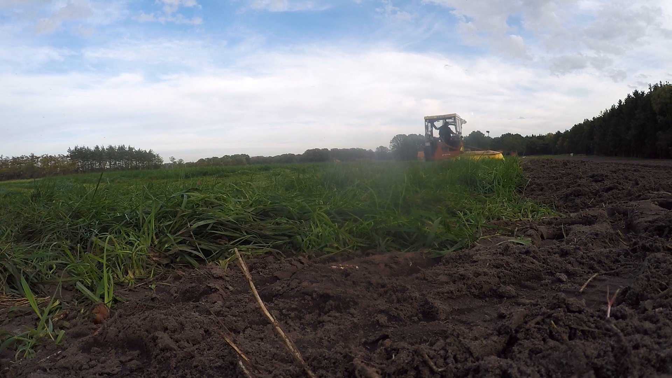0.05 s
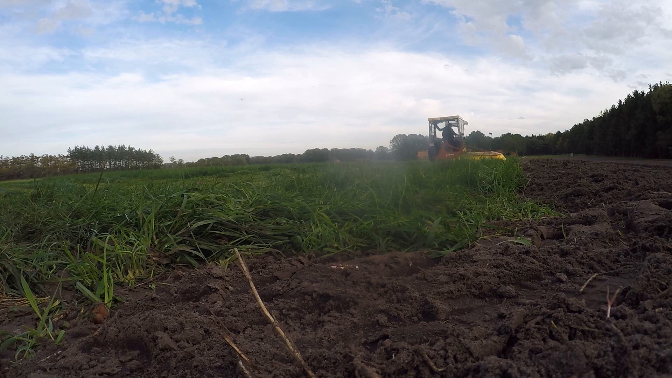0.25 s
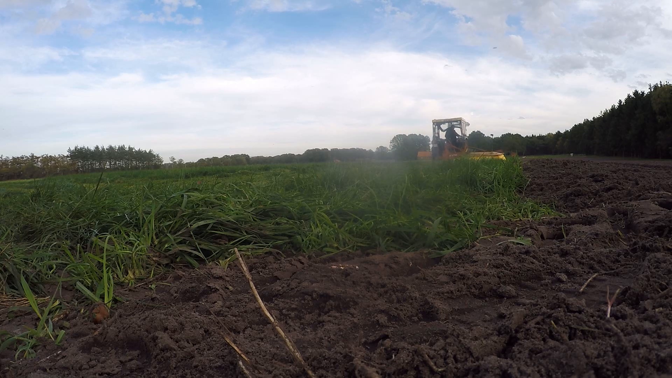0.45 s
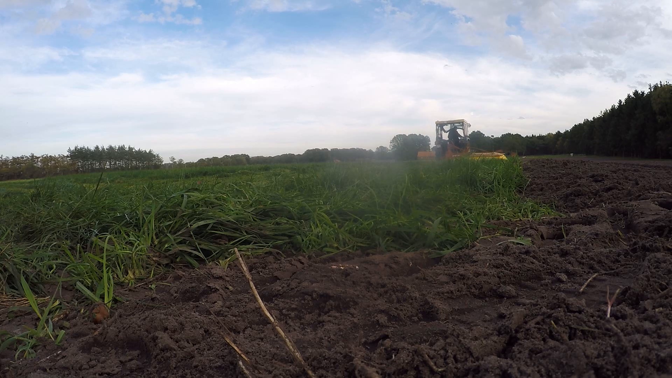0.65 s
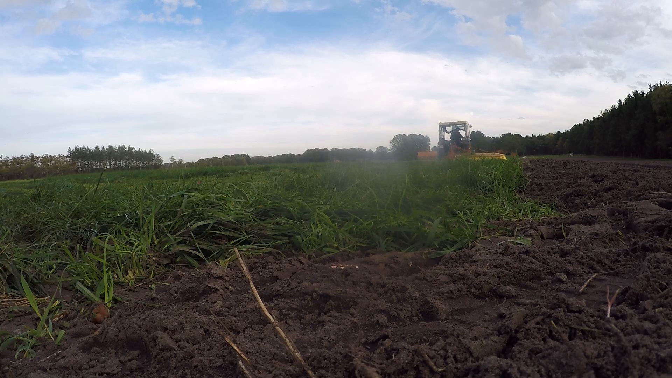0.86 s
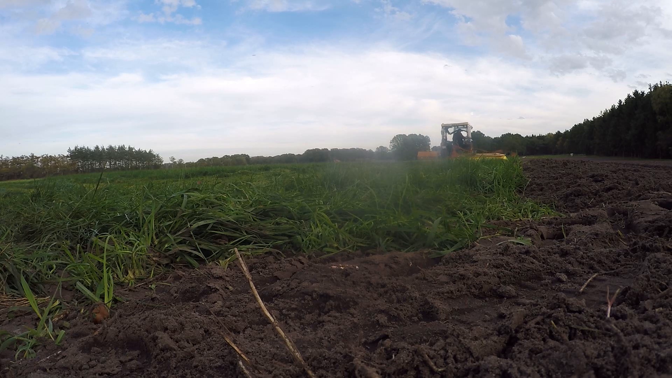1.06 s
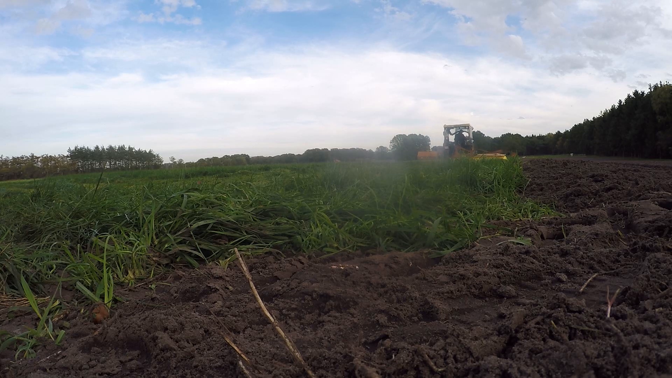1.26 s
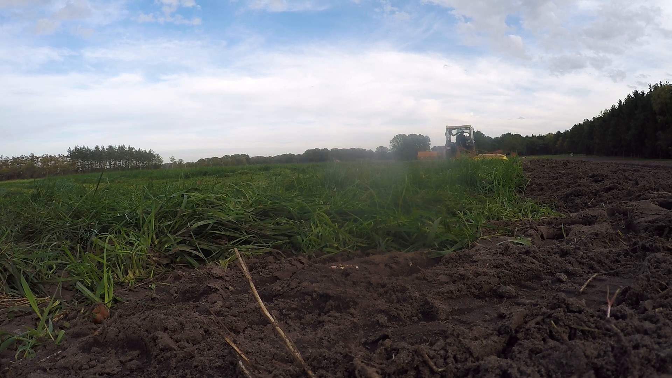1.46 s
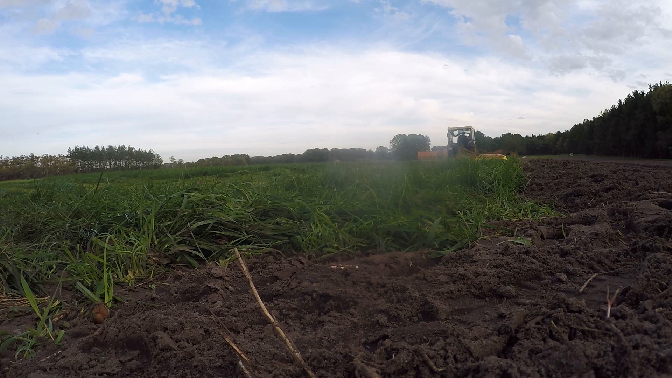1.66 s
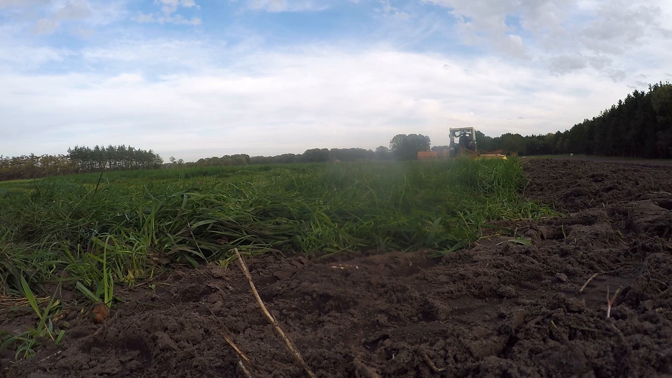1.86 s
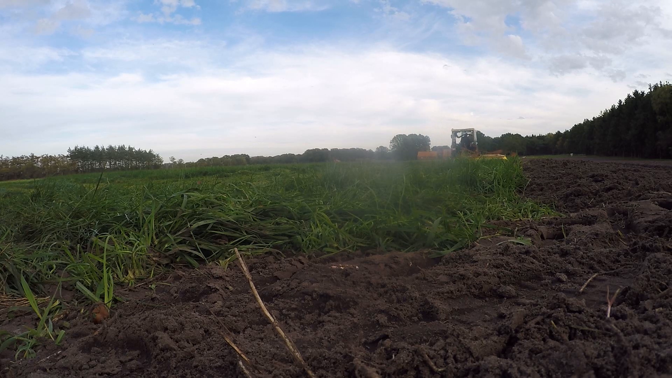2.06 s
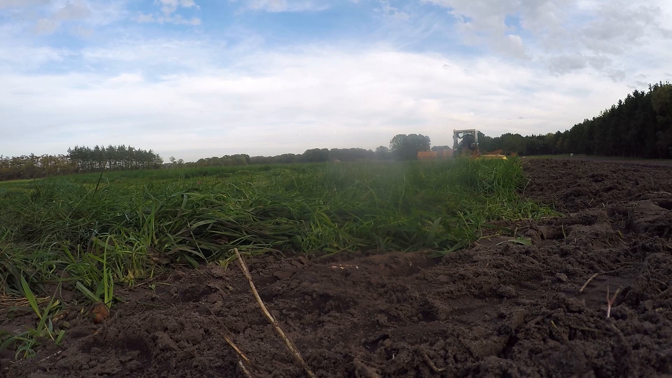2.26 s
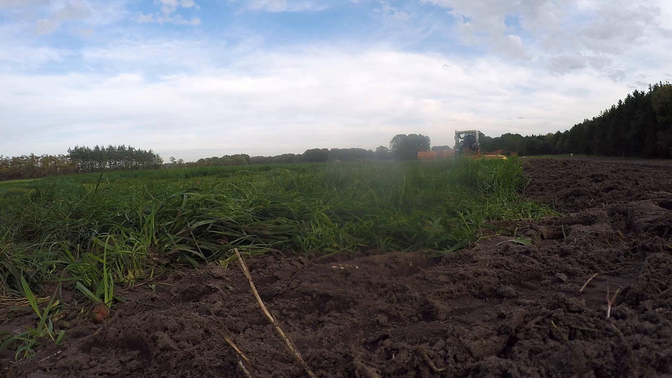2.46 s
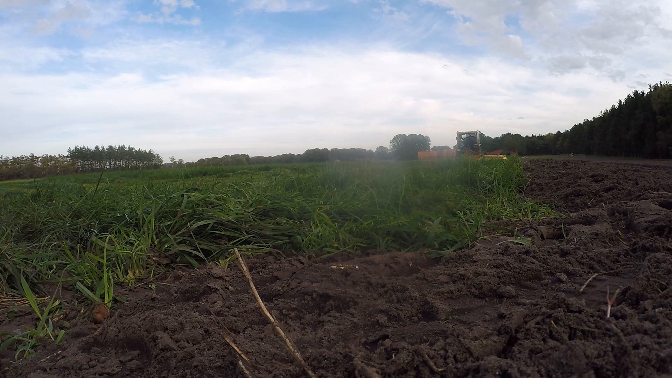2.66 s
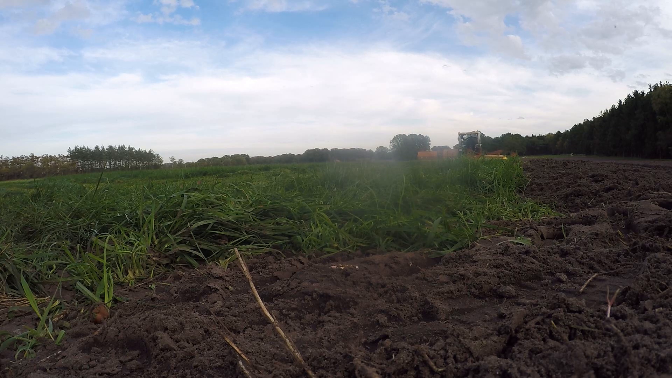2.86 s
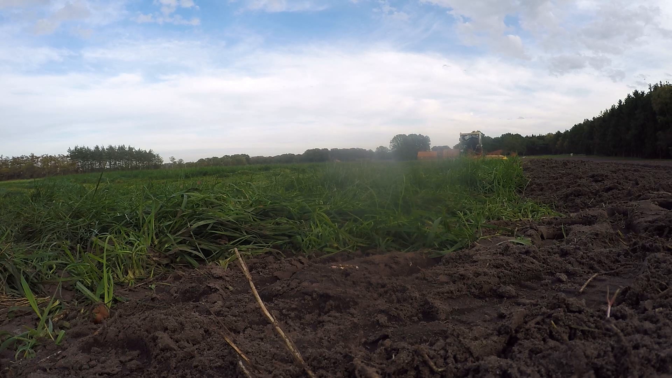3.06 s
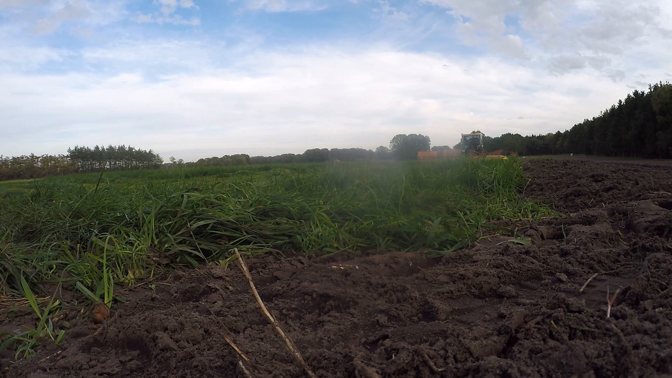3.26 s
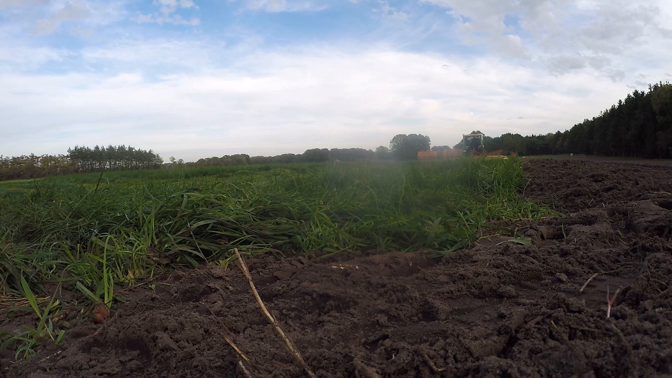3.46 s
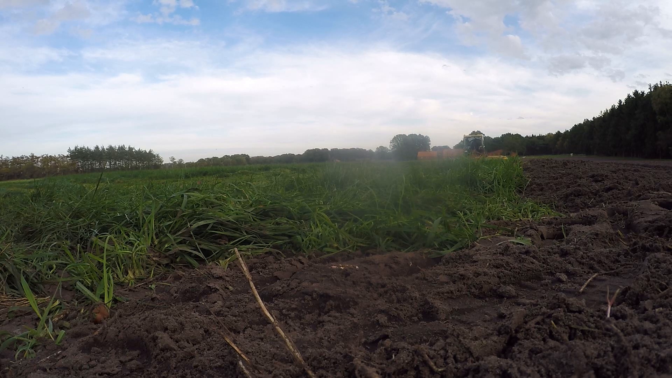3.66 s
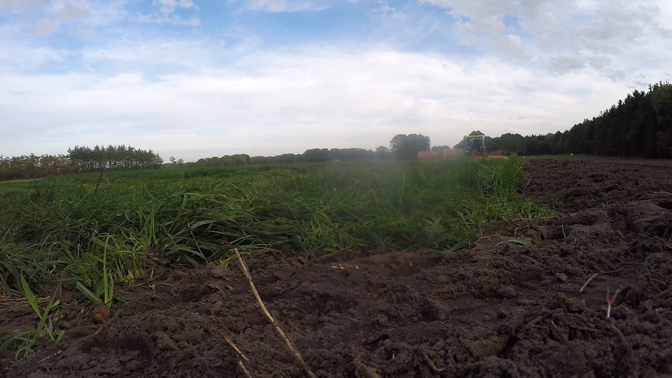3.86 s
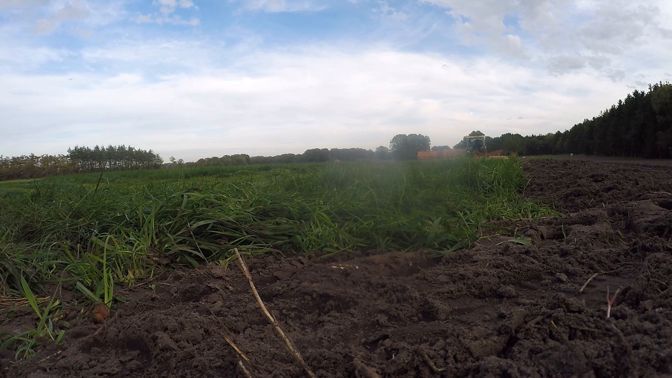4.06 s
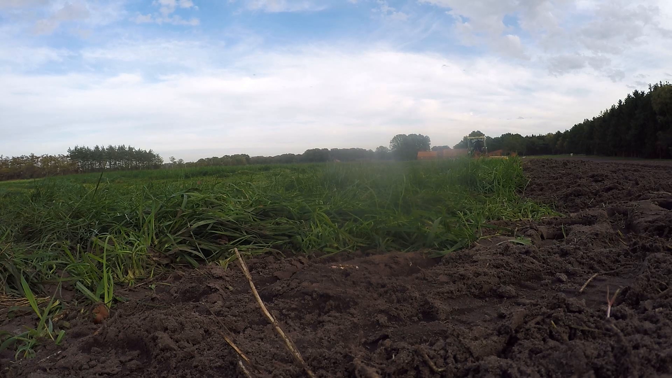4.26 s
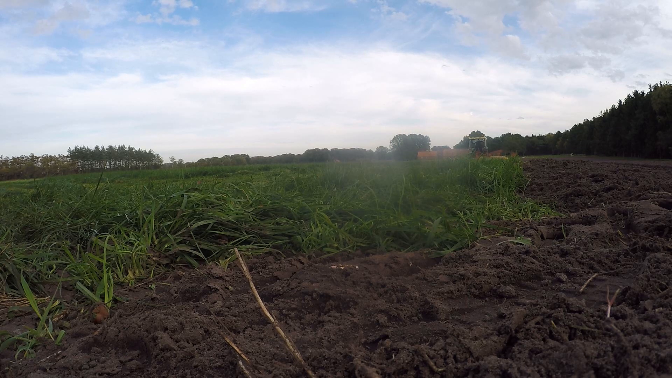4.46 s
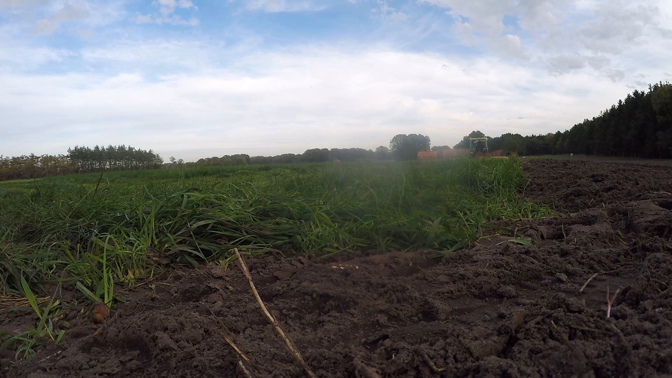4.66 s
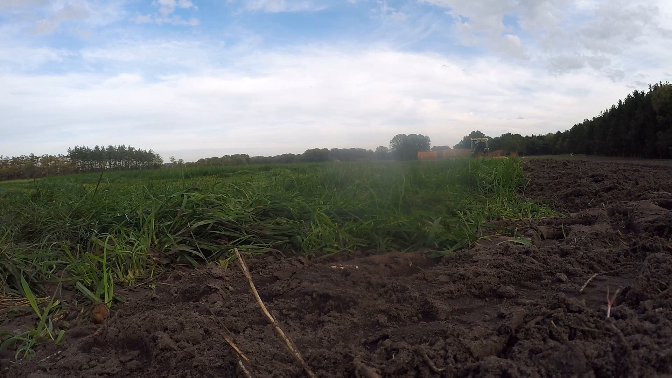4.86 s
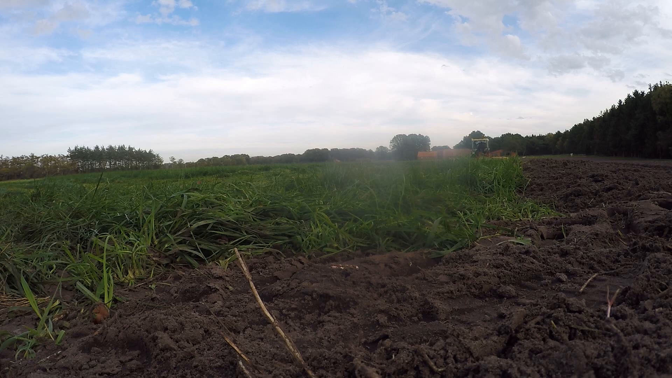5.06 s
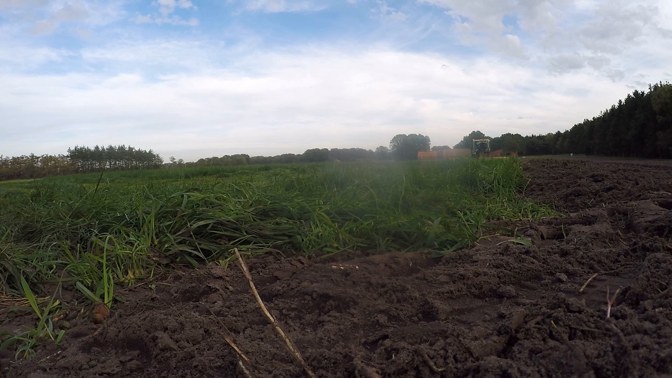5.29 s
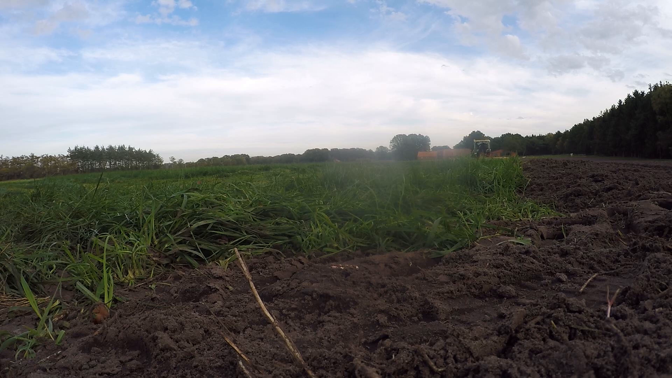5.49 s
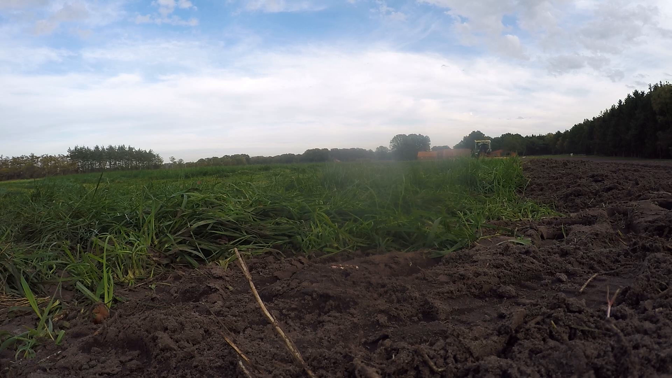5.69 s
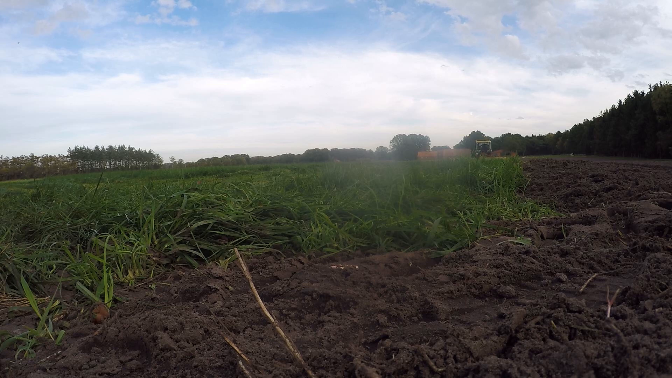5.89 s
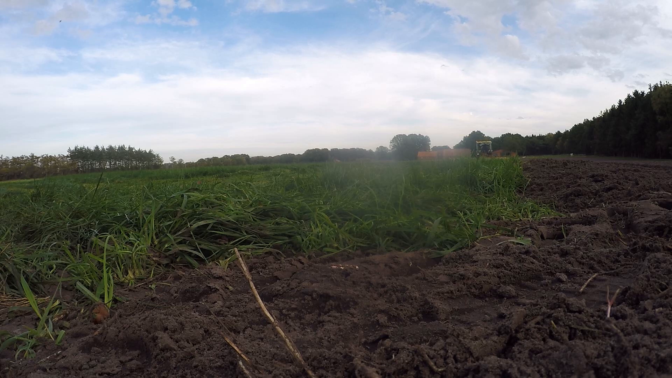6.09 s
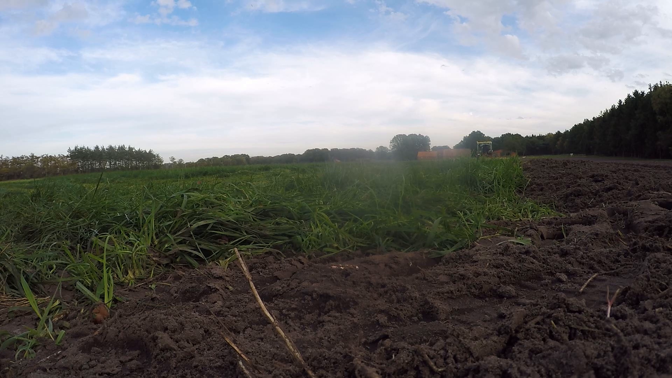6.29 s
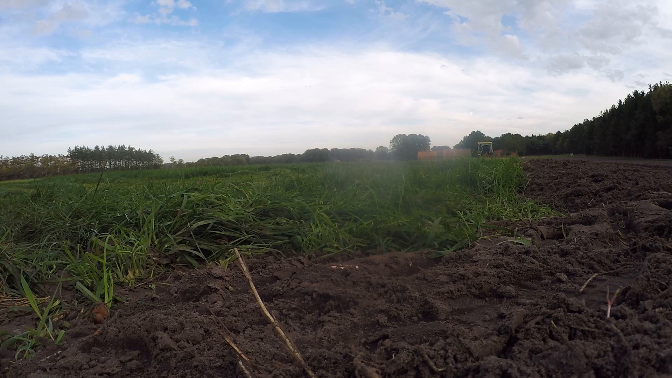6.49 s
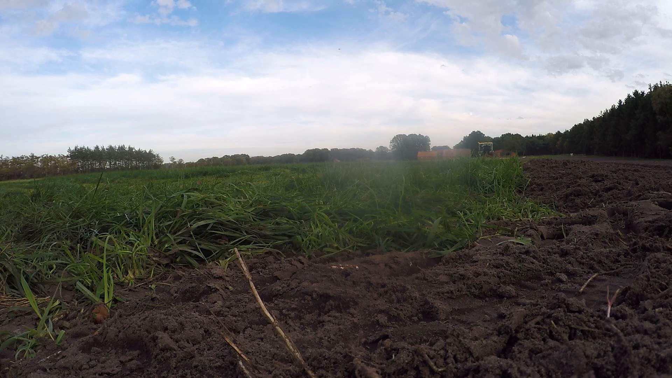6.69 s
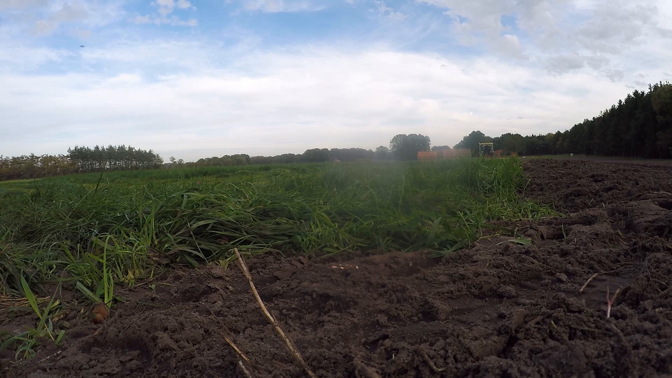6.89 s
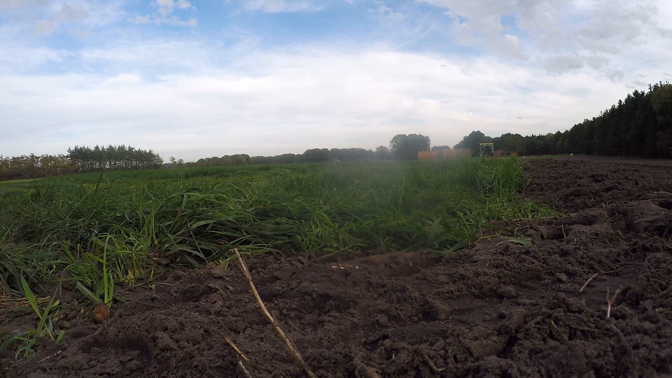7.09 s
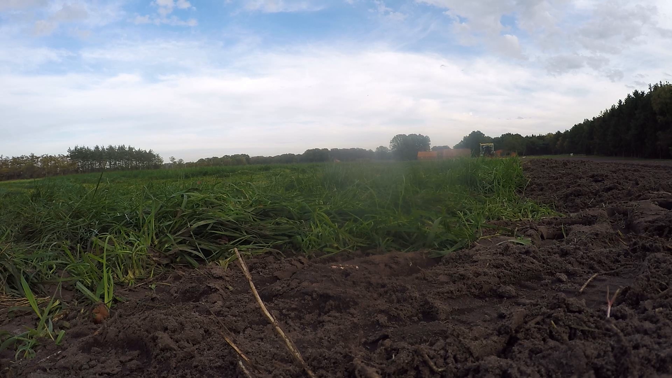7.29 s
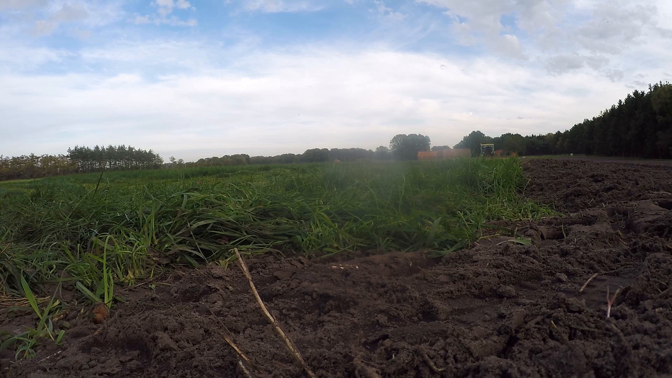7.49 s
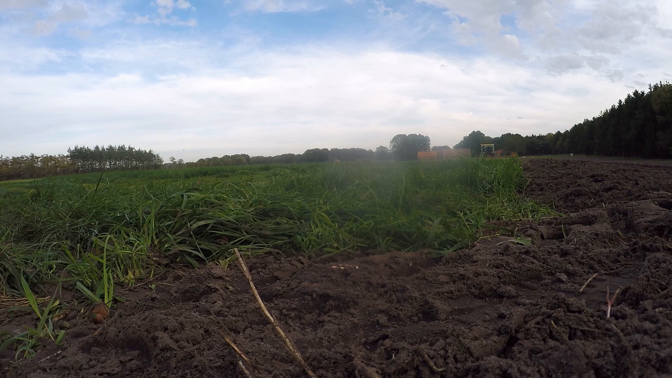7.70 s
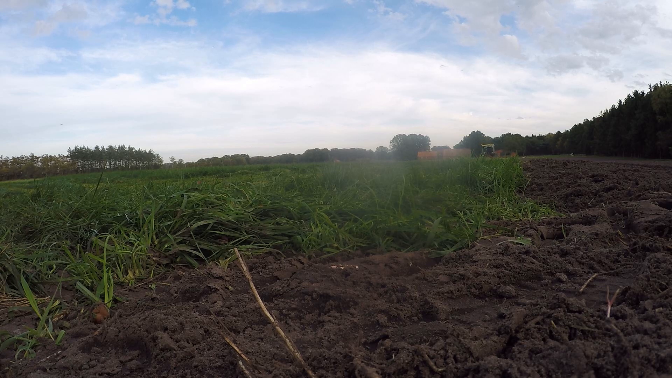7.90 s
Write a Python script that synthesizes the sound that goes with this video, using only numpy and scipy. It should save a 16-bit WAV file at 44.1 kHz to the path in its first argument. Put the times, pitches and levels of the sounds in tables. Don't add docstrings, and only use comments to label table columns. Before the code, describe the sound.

Low diesel hum and thrashing mower roar with fast shredding hiss, metallic clinks and dry squeaks, starting fairly close and steadily receding outdoors.

```python
import sys
import numpy as np
from scipy import signal
from scipy.fft import rfft, irfft, next_fast_len
from scipy.io import wavfile
from scipy.ndimage import uniform_filter1d

SR = 44100
rng = np.random.default_rng(int(sys.argv[2]) if len(sys.argv) > 2 else 0)


def waveform_to_disk(signal):
    frames = np.transpose(np.atleast_2d(signal))
    scaled = np.clip(frames, -1, 1) * 32767
    samples = np.round(scaled).astype(np.int16)
    wavfile.write(sys.argv[1], SR, samples)


def amplitude_ratio(level_db):
    exponent = np.asarray(level_db, float) / 20
    return 10 ** exponent


N = 350154

# time_s, firing_rate_hz
ENGINE_SPEED = [
    (0, 51.88),
    (.25, 51.88),
    (.5, 51.19),
    (1, 51.77),
    (1.4, 52.1),
    (2.2, 52.3),
    (3, 52.36),
    (3.6, 52.57),
    (5, 52.67),
    (7.94, 52.68),
]
EXHAUST_LINES = {3: 1, 4: -33, 8: -17, 9: -9, 10: -37, 15: -29}
ROTOR_LINES_DB = [-14, -18, -19]
FAN_LINES_DB = [-16, -6, -14, -20, -21]
# frequency_hz, density_db_per_hz
ROAR_SPECTRUM = [(20, -11), (60, -7), (130, -7.5), (185, -1.5), (228, -1), (310, -4), (400, -7), (575, -11),
                 (630, -16.5), (850, -24.5), (1100, -39.5), (1500, -36), (2000, -29), (3000, -74)]
# centre_s, length_s, level_db
ROAR_SWELLS = [
    (.52, 0.33, 2),
    (1.294, 0.17, 0.5),
    (2.8, 0.23, 1),
    (4.0, 0.6, 2),
    (5.35, 0.12, 1),
]
# frequency_hz, density_db_per_hz
CUT_SPECTRUM = [(600, -9.5), (1000, -14), (1250, -18.5), (1600, -15.5), (2400, -8), (3000, -6),
                (3800, -1.5), (4500, -4), (5600, -6), (7400, -10.5), (8300, -15.5), (10300, -15.5),
                (11300, -23.5), (15300, -29.5)]
# frequency_hz, width_hz, level_db (re cutting noise)
STEEL_MODES = [(1848, 36, -22), (2126, 40, -25), (2670, 50, -21), (2945, 36, -16.5), (3251, 40, -16),
               (4096, 55, -13), (4270, 40, -18), (4947, 110, -15), (5262, 36, -16), (6429, 38, -19),
               (6600, 120, -18), (7025, 40, -25), (7735, 40, -25), (8037, 40, -27), (8694, 80, -26),
               (9135, 120, -26), (9566, 60, -30), (10115, 30, -30), (10233, 30, -31), (10524, 40, -28),
               (10917, 40, -31), (11461, 40, -35), (11654, 40, -38), (11864, 50, -36), (12031, 30, -39),
               (12343, 35, -39), (13226, 45, -34), (13549, 30, -41), (14222, 45, -35), (14577, 42, -34)]
# time_s, crop_thickness_db, rotor_facing_back_db
CROP_LOAD = [(0, -1.1, -1.5), (.5, -1.1, -2), (.95, 0.5, -2.5), (1.25, 0.4, 0), (1.9, -1.3, -0.5),
             (2.45, 1, -1), (2.7, -.3, -0.8), (3.4, 0, 1), (3.72, 0.7, 0.5), (3.85, -2, 0.5), (4.2, 1.6, 0),
             (4.45, 0, -0.2), (5, -0.1, 0.7), (5.5, 1.5, 2.5), (6.15, 1, 2.5), (6.4, -1.3, 1.8),
             (7.3, -1.1, 1.5), (7.94, -2.1, 2.5)]
# start_s, peak_db, pitch_hz
PIVOT_SQUEAKS = [(0.0867, -23, 6760), (0.4763, -34, 6460), (0.5087, -25, 7060), (0.6399, -25, 7660),
                 (0.7971, -27, 6910), (0.9193, -18, 7530), (0.9797, -22, 7000), (1.0126, -22, 6910),
                 (1.503, -26, 6730), (1.718, -25, 6440), (1.8721, -25, 6430), (1.9709, -29, 6650),
                 (2.8599, -22, 6840), (3.0859, -23, 6630), (3.6611, -21.5, 7600), (4.2956, -25, 6580),
                 (4.3335, -24, 6750), (4.6384, -26, 6580), (4.6952, -24, 6440), (4.7257, -22, 6660),
                 (5.0055, -22, 7230), (5.0898, -19, 6540), (5.2734, -28, 6680), (5.5488, -22, 6680),
                 (5.5797, -23, 6600), (5.8242, -21, 6690), (5.884, -30, 6500), (6.5919, -21.5, 7140),
                 (6.7446, -27, 6700), (7.2045, -25, 7610),
                 (0.0528, -28, 7380), (0.159, -22, 7260), (0.1794, -21, 6800), (0.2239, -27, 7260),
                (1.0465, -28, 7640), (1.07, -26, 7140), (1.1014, -27, 8000), (1.1702, -29, 7520),
                (2.2234, -28, 7860), (2.7382, -29, 7260), (3.1667, -23, 7680), (3.4775, -23, 6870),
                (3.5099, -26, 7640), (4.0896, -27, 7740), (4.9731, -31, 7640), (5.5209, -26, 6850),
                (5.6486, -26, 7710), (6.7087, -32, 7710), (7.1751, -31, 7080), (7.6635, -25.5, 7240),
                (7.7533, -35, 7490), (7.8406, -28, 7490)]
# start_s, peak_db, pitch_hz
HOOD_CLINKS = [(0.0538, -24, 4070), (0.1266, -19, 4110), (0.2843, -17, 4080), (0.5327, -31, 4030),
               (0.6516, -17.5, 4120), (0.7422, -16, 4080), (0.828, -12.5, 4070), (0.9552, -28, 4160),
               (1.1029, -26, 4110), (1.2007, -19, 4110), (1.482, -25, 4160), (2.0622, -28, 4070),
               (3.263, -23, 4100), (4.081, -30, 4050), (4.555, -25, 4040), (6.2337, -29, 4080)]
# start_s, length_s, pitch_hz, glide_hz, level_db
HOOD_GROANS = [
    (.36, .34, 460, 26.5, -24),
    (.395, 0.061, 292, 0, -16.5),
    (.2, .1, 650, -4, -29),
    (.47, .1, 335, 10, -24),
    (.67, .17, 512, 2, -24),
    (.8, 0.24, 485, -2, -29),
    (.95, 0.19, 280, -3, -25.5),
    (1.15, .25, 455, 2, -28),
]
# start_s, length_s, pitch_hz, level_db
PANEL_WHINES = [
    (0.48, 0.52, 2800, -37),
    (4, .25, 4096, -40),
    (6.6, .2, 4800, -52),
    (4.1, 1.3, 6540, -47),
    (0.056, 0.05, 2945, -27.5),
    (5.1, 1.1, 14577, -64),
    (4.5, 1.3, 6440, -48),
    (1.0, 0.51, 5262, -51),
]

START_M, AWAY_M_S = 18.76, 3.06
TONE_DB, ROAR_DB, CUT_DB, AIR_DB = -21.5, -21, -27, -53
ROAR_FADE, UPPER_FADE, CUT_FADE, HOOD_FADE, AIR_FADE = .35, 1.6, 0.18, 0.62, .8
FACING_GAIN = 1.9
OCTAVE_DB, OCTAVE_BEST_S, OCTAVE_SAG_DB_PER_S2 = 2.2, 5.04, 0.08
ROTOR_GEAR, FAN_GEAR, ROTOR_START_TURN = .62176, 1.6166, .76
FAINT_SQUEAK_DB, FAINT_CLINK_DB = -24, -26
MIC_TOP_HZ = 15270


def time_s():
    return np.arange(N) / SR


def curves(table):
    knot_s, *columns = np.transpose(table)
    return [np.interp(time_s(), knot_s, column) for column in columns]


def unit(x):
    return x / np.sqrt(np.mean(x ** 2))


def walk(rate_hz):
    step = int(SR / rate_hz)
    count = N // step + 2
    return 1.22 * np.interp(np.arange(N) / step, np.arange(count), rng.standard_normal(count))


def bands(x, spectrum_db, lo_hz, count):
    size = next_fast_len(N)
    octave = np.log2(np.maximum(np.arange(size // 2 + 1) * SR / size, 1))
    knot_hz, knot_db = np.transpose(spectrum_db)
    coloured = rfft(x, size) * amplitude_ratio(np.interp(octave, np.log2(knot_hz), knot_db))
    for k in range(count):
        place = 2 * (octave - np.log2(lo_hz)) - k
        window = np.clip(1 - np.abs(place), 0, 1)
        yield lo_hz * 2 ** (k / 2), irfft(coloured * window, size)[:N]


def ring(x, pitch_hz, width_hz):
    b, a = signal.iirpeak(pitch_hz, pitch_hz / width_hz, fs=SR)
    return unit(signal.lfilter(b, a, x))


def distance_db():
    return -20 * np.log10(1 + AWAY_M_S * time_s() / START_M)


def relative_distance_db():
    loss_db = distance_db()
    return loss_db - loss_db.mean()


def air():
    return amplitude_ratio(AIR_DB + .7 * walk(3.2)) * ring(rng.standard_normal(N), 1280, 900)


def roar():
    swell_db = 0
    for centre_s, length_s, db in ROAR_SWELLS:
        swell_db = swell_db + db * np.exp(-((time_s() - centre_s) / length_s) ** 2)
    spin_up_db = -3.5 * np.exp(-time_s() / 0.39)
    upper_db = UPPER_FADE * relative_distance_db() + swell_db
    out = 0
    for hz, band in bands(rng.standard_normal(N), ROAR_SPECTRUM, 16.0, count=14):
        share = np.interp(np.log(hz), np.log([280, 450, 640, 900, 1300]), [0.008, .55, 0.81, 1.95, 0.37])
        flutter_db = 0.98 * walk(3.11) + .5 * walk(8.7)
        out = out + amplitude_ratio(share * upper_db + (1.5 - 0.35 * share) * spin_up_db + flutter_db) * band
    crop_db = curves(CROP_LOAD)[0]
    return unit(out) * amplitude_ratio(ROAR_DB + 3.5 + (1 + ROAR_FADE) * distance_db() + .3 * crop_db)


def groans():
    out = np.zeros(N)
    for start_s, length_s, hz, glide_hz, db in HOOD_GROANS:
        t = np.arange(int(length_s * SR)) / SR
        tone = np.sin(2 * np.pi * (hz + glide_hz * t / length_s / 2) * t)
        swell = np.sqrt(2 * np.sin(np.pi * t / length_s))
        out[int(start_s * SR):][:len(t)] += amplitude_ratio(db) * swell * tone
    return out


def whines():
    out = np.zeros(N)
    for start_s, length_s, hz, db in PANEL_WHINES:
        progress = np.clip((time_s() - start_s) / length_s, 0, 1)
        swell = np.sqrt(np.abs(np.sin(np.pi * progress)))
        out += amplitude_ratio(db + 2.5 * walk(20)) * swell * ring(rng.standard_normal(N), hz, 30)
    return out


def faint(count, db, lo_hz, hi_hz):
    place, weakness, pitch = rng.random((count, 3)).T
    peak_db = db - 8 * weakness + distance_db()[(place * N).astype(int)]
    return np.transpose([place * N / SR, peak_db, lo_hz + (hi_hz - lo_hz) * pitch ** 2])


def scrapes(table, wander_hz, rise_s, fall_s, gain_db):
    out = np.zeros(N + SR)
    t = np.arange(SR // 10) / SR
    wander = unit(uniform_filter1d(rng.standard_normal((len(table), len(t))), size=40))
    envelope = (1 - np.exp(-t / rise_s)) * np.exp(-t / fall_s)
    for (start_s, db, hz), shake in zip(table, wander):
        tone = np.sin(2 * np.pi * np.cumsum(hz + wander_hz * shake) / SR)
        out[int(start_s * SR):][:len(t)] += amplitude_ratio(db + gain_db) * envelope * tone
    return out[:N]


def squeaks():
    faint_squeaks = faint(count=60, db=FAINT_SQUEAK_DB, lo_hz=6400, hi_hz=7680)
    faint_clinks = faint(count=26, db=FAINT_CLINK_DB, lo_hz=4070, hi_hz=4200)
    pivots = np.vstack([PIVOT_SQUEAKS, faint_squeaks])
    hood = np.vstack([HOOD_CLINKS, faint_clinks])
    chirping = scrapes(pivots, wander_hz=340, rise_s=0.0021, fall_s=0.0043, gain_db=3.5)
    return chirping + scrapes(hood, wander_hz=80, rise_s=0.0031, fall_s=0.011, gain_db=1.0)


def hum(firings):
    octave_db = OCTAVE_DB - OCTAVE_SAG_DB_PER_S2 * (time_s() - OCTAVE_BEST_S) ** 2
    lines = [(third / 3, db) for third, db in EXHAUST_LINES.items()] + [(2, octave_db)]
    lines += [(ROTOR_GEAR * (k + 1), db) for k, db in enumerate(ROTOR_LINES_DB)]
    lines += [(FAN_GEAR * (k + 1), db) for k, db in enumerate(FAN_LINES_DB)]
    out = 0
    for multiple, db in lines:
        level = amplitude_ratio(db + .25 * multiple * walk(5.5))
        out = out + level * np.sin(2 * np.pi * (multiple * firings + rng.random()))
    return np.sqrt(2) * amplitude_ratio(TONE_DB + distance_db()) * out


def far_treble_db(hz, facing_db):
    share = np.clip(np.log2(hz / 9500) / .45, 0, 1.4)
    return share * (FACING_GAIN * facing_db + AIR_FADE * relative_distance_db())


def rotor_beat(firings):
    rotor = ROTOR_GEAR * firings + ROTOR_START_TURN
    turn, phase = rotor.astype(int), rotor % 1
    turn_db = 6.5 * np.tanh(0.52 * rng.standard_normal((turn[-1] + 1, 3)))
    return uniform_filter1d(np.exp(-phase / 0.66) * amplitude_ratio(turn_db)[turn].T, size=400)


def stray_blows():
    hits = (rng.random(N) < 150 / SR) * amplitude_ratio(12 * np.tanh(0.66 * rng.standard_normal(N)))
    return signal.lfilter([1], [1, -.994], hits)


def cutting_hiss(beat, facing_db):
    stray = stray_blows()
    hiss = 0
    for k, (hz, band) in enumerate(bands(rng.standard_normal(N), CUT_SPECTRUM, 670, count=10)):
        bright = np.clip(np.log2(hz / 1800) / 2.46, 0, 1)
        blows = 1 + bright * (1.44 * beat[k // 4] + 0.76 * stray)
        hiss = hiss + amplitude_ratio(far_treble_db(hz, facing_db) + 0.5 * walk(14)) * unit(blows) * band
    return unit(hiss)


def struck_steel(beat, facing_db):
    hood_db = HOOD_FADE * relative_distance_db()
    pivot_db = .9 * facing_db - .4 * hood_db
    steel = 0
    for hz, width_hz, db in STEEL_MODES:
        blows = (1 + beat[1]) * amplitude_ratio(2.6 * walk(18)) * rng.standard_normal(N)
        if hz < 5500:
            struck_db = 1.8 * hood_db
        elif hz < 8000:
            struck_db = 2.2 * pivot_db - 2
        else:
            struck_db = 1.5 * far_treble_db(hz, facing_db)
        steel = steel + amplitude_ratio(db + struck_db + .6 * walk(1.32)) * ring(blows, hz, 0.66 * width_hz)
    return steel


def flails(firings):
    crop_db, facing_db = curves(CROP_LOAD)
    beat = rotor_beat(firings)
    level_db = CUT_DB + (1 + CUT_FADE) * distance_db() + crop_db
    return amplitude_ratio(level_db) * (cutting_hiss(beat, facing_db) + struck_steel(beat, facing_db))


def scene():
    firings = np.cumsum(curves(ENGINE_SPEED)[0]) / SR
    machine = roar() + groans() + whines() + squeaks() + hum(firings) + flails(firings)
    return (air() + machine)[None]


def roll_off(x):
    return signal.sosfilt(signal.butter(12, 15920, fs=SR, output="sos"), x)


def record(dry):
    low_pass = signal.ellip(12, .1, 60, MIC_TOP_HZ, fs=SR, output="sos")
    mix = signal.sosfiltfilt(low_pass, dry, padtype="even")
    return roll_off(mix)


dry = scene()
out = record(dry)
waveform_to_disk(out)
```